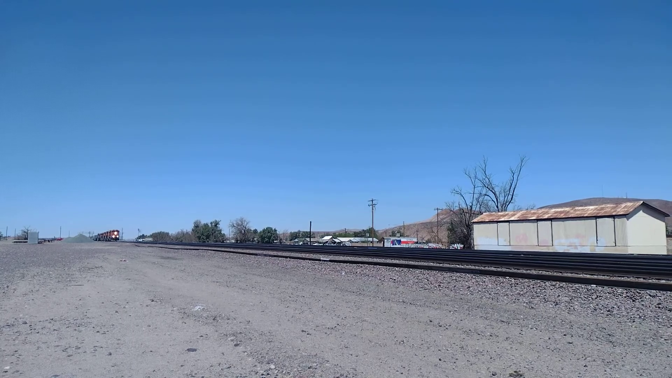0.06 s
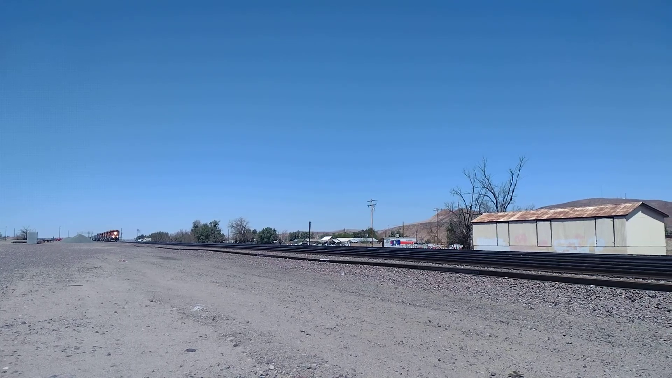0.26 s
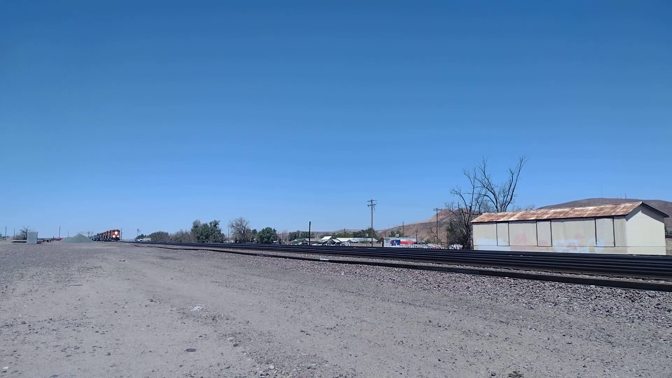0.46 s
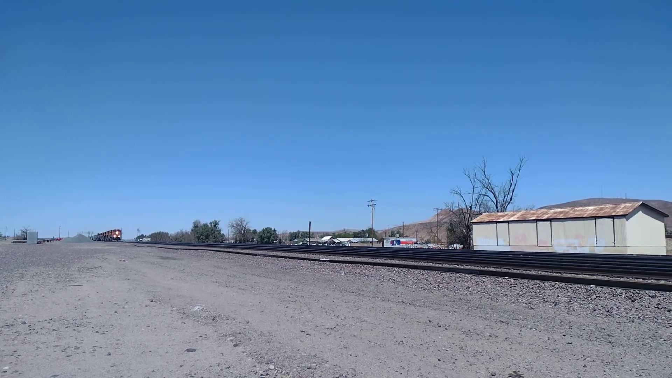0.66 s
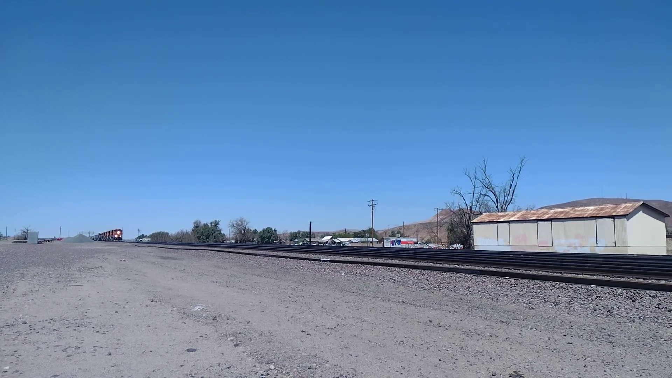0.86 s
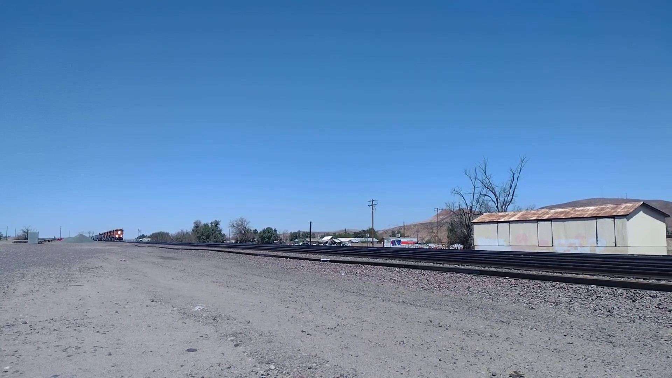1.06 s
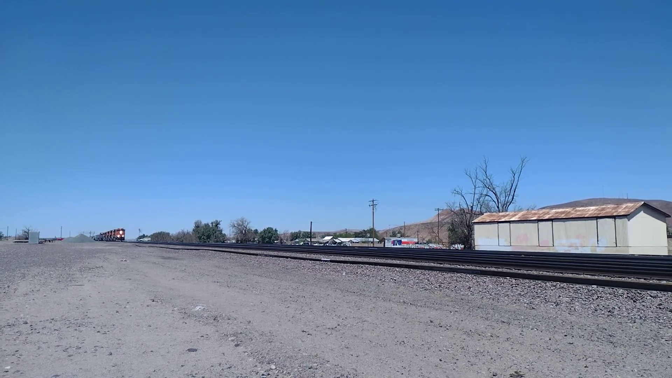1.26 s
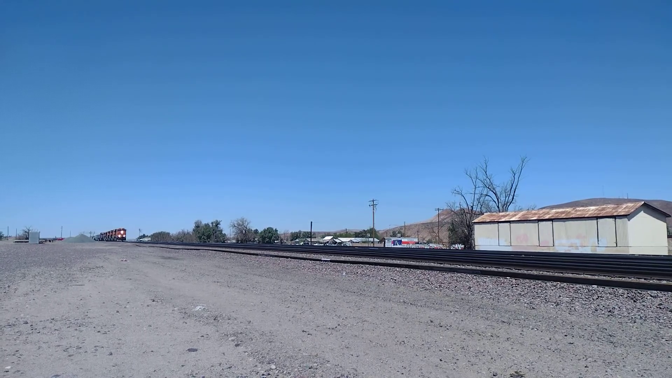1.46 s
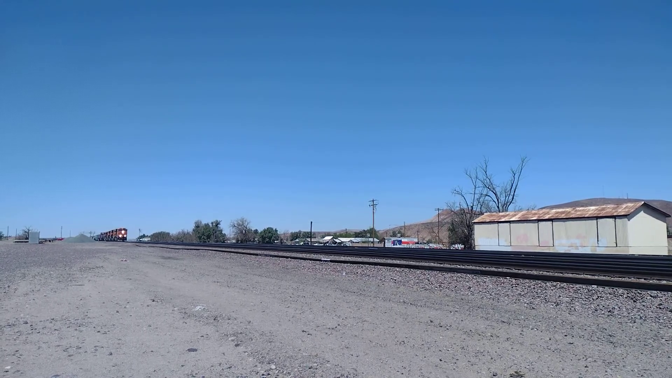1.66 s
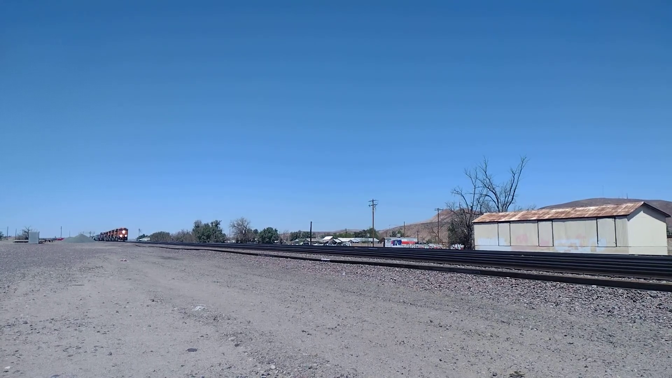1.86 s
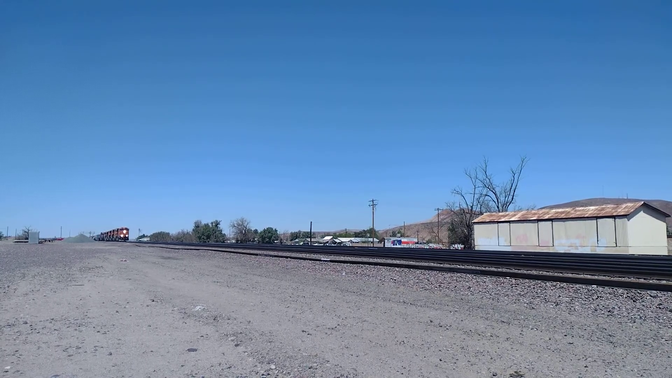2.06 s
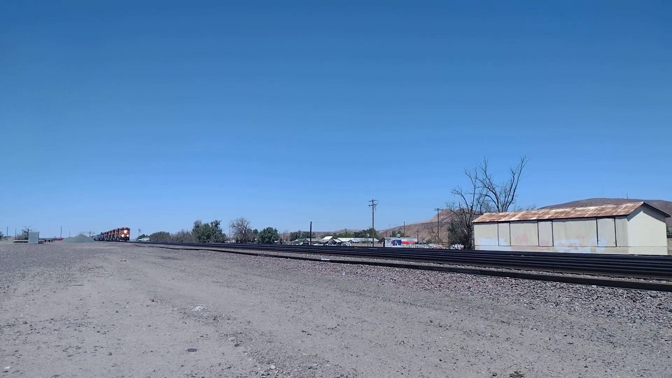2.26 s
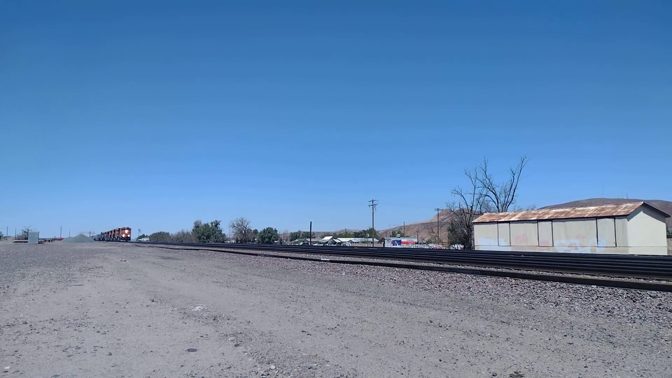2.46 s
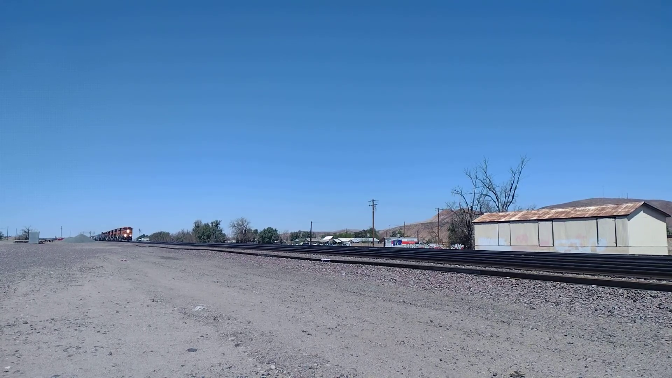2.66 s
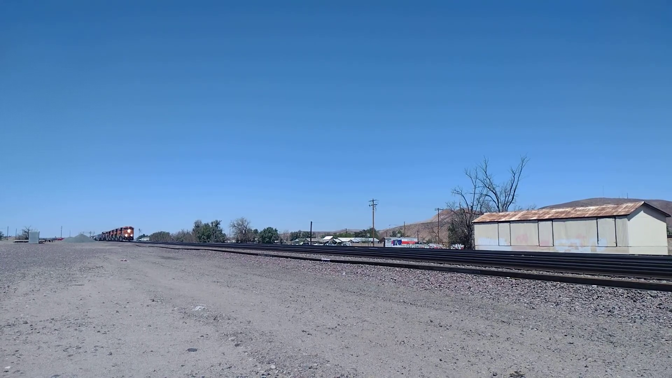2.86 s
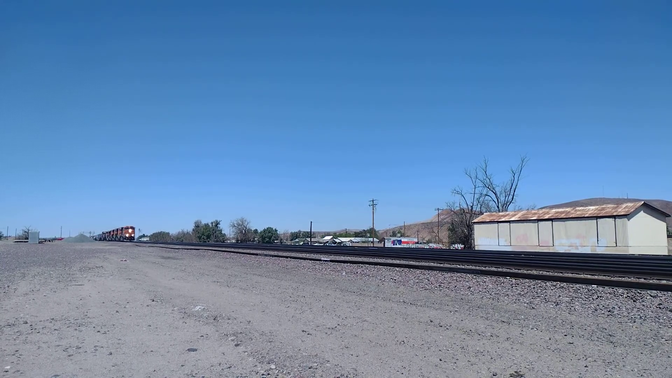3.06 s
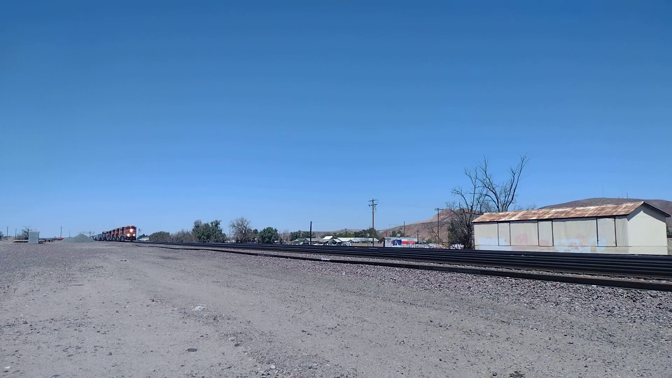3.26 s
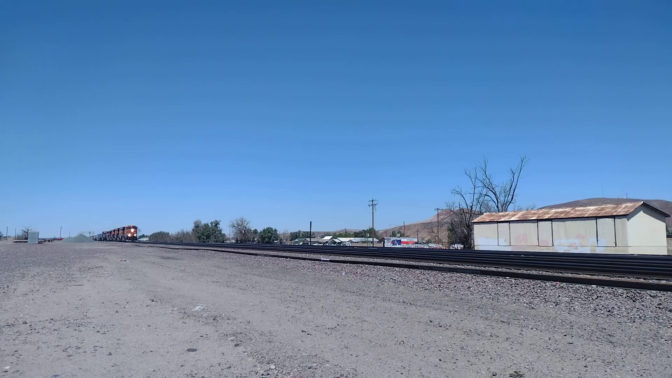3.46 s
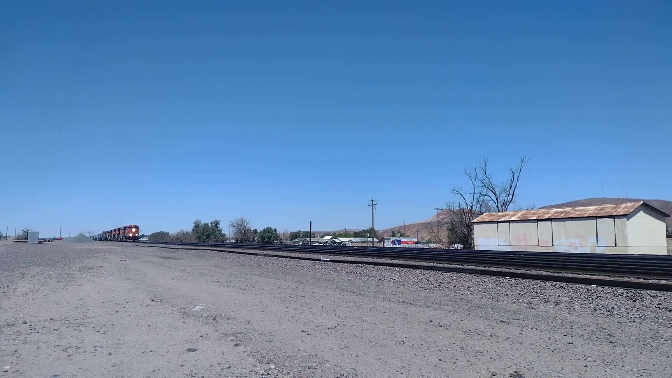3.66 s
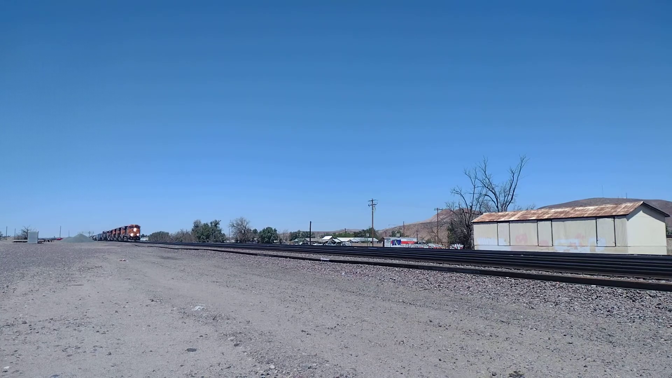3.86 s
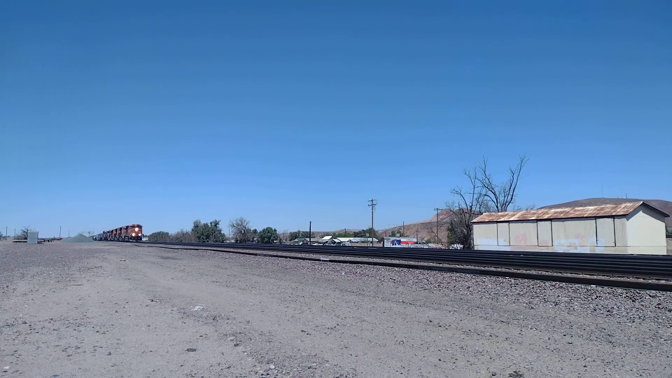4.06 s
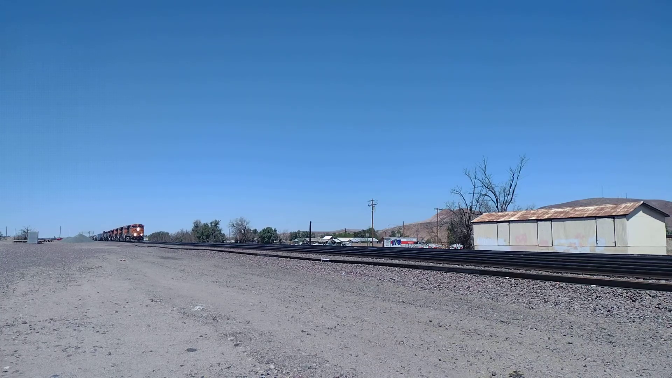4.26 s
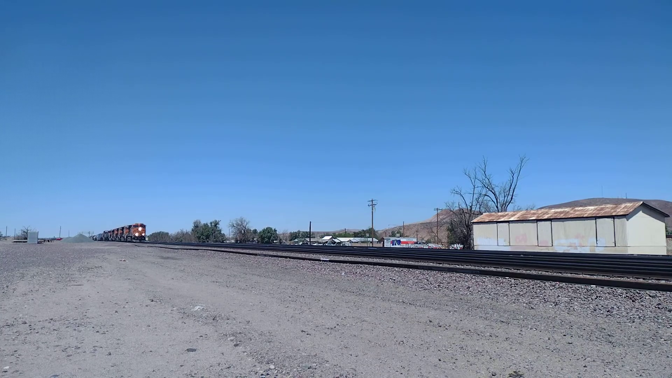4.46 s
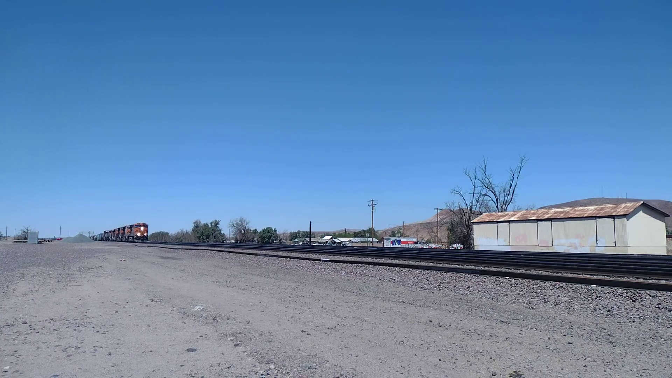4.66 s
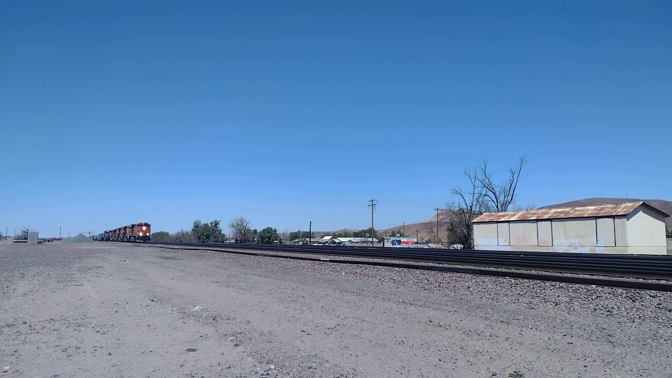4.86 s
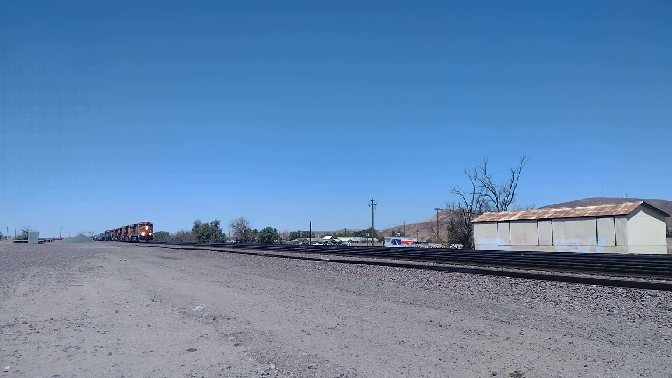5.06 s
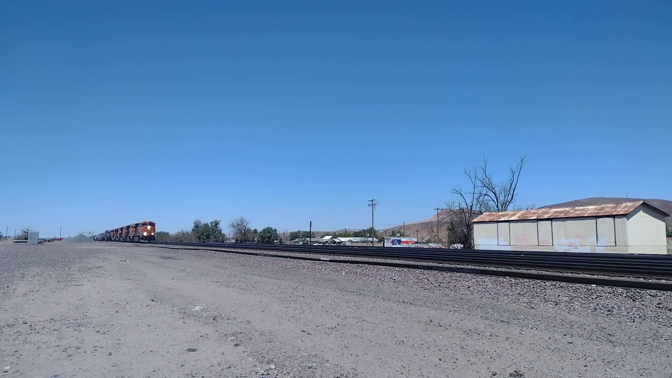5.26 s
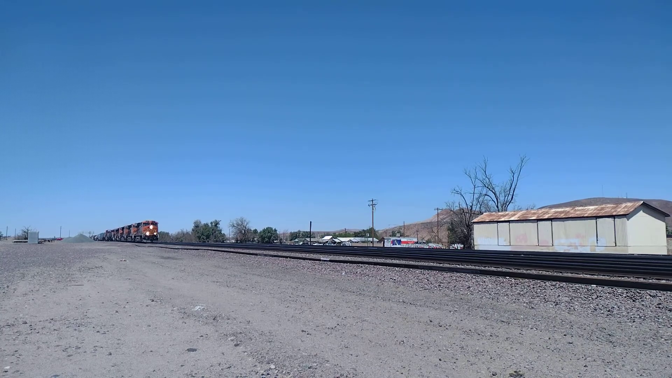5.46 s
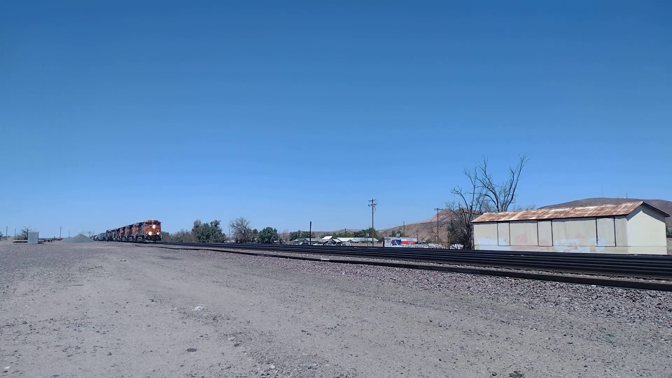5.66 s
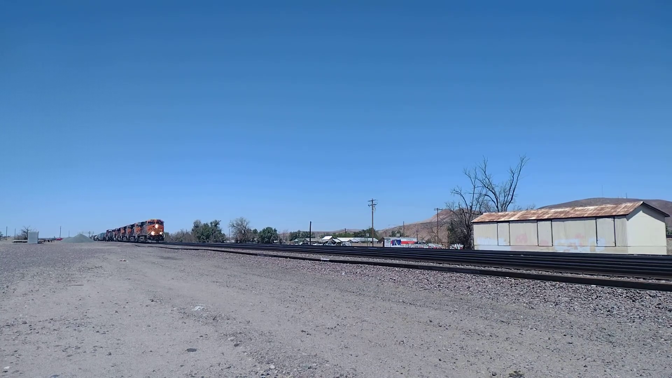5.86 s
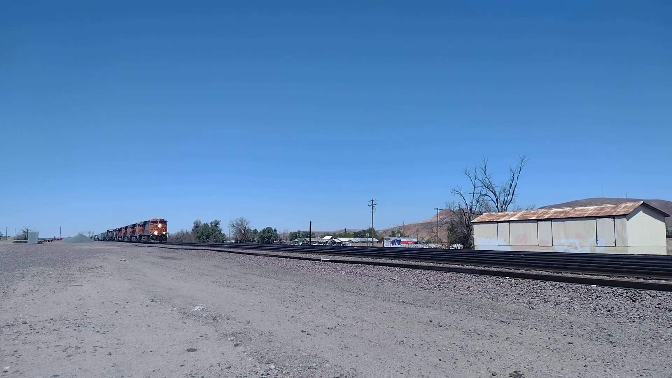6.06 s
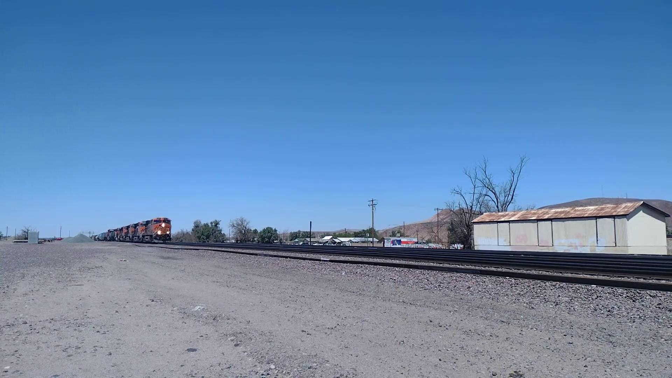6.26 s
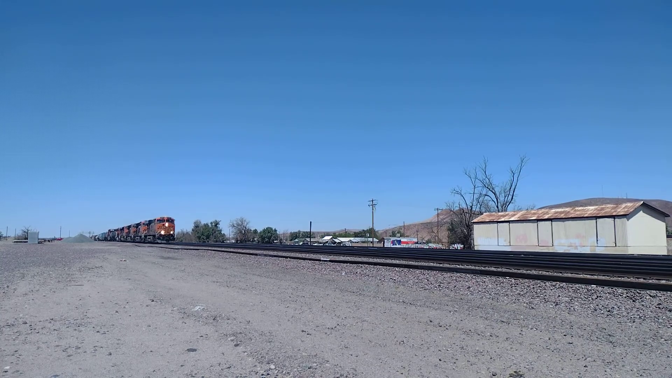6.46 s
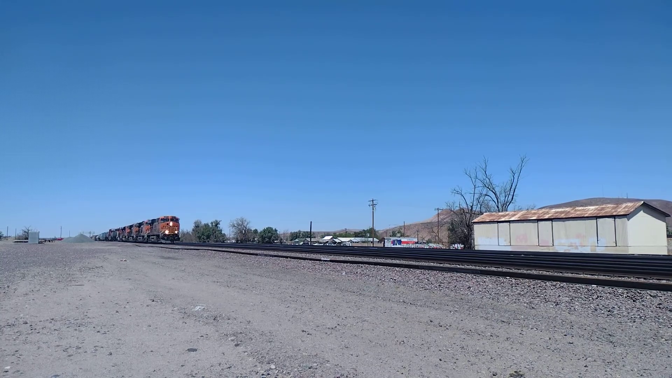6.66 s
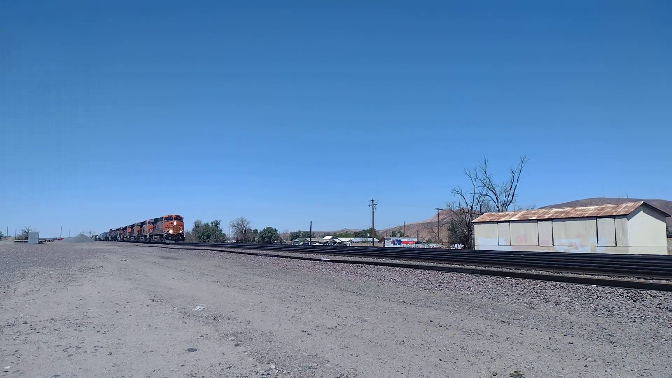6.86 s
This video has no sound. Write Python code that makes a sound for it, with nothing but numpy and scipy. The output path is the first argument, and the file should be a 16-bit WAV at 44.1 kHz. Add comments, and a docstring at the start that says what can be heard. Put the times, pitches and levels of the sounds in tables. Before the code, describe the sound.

A distant diesel freight train throbs steadily louder across an open gravel yard, with chirping birds, faint rail sizzle and three dull knocks.

```python
"""Beside the track in an open rail yard, a freight train approaches from the left for about seven seconds.
First come the yard's air, ticks and scuffs on gravel (noise) and a near bird's whistle (a gliding sine).
Harsh bird notes (noise bursts) and a farther bird's thin slurs (sines) join in; calls go on to the end.
All the while two diesels throb (sine lines, cylinder puffs), and wheels roar and rails sizzle (noise).
From 4.4 s three dull knocks come from the train, and near the end the rails give one faint squeak."""
import sys
import numpy as np
from scipy import signal
from scipy.fft import rfft, irfft, next_fast_len
from scipy.io import wavfile
from scipy.ndimage import uniform_filter1d, map_coordinates

SR = 44100
rng = np.random.default_rng(int(sys.argv[2]) if len(sys.argv) > 2 else 0)


def file_out(sig):
    """Save sig as 16-bit WAV at sys.argv[1]."""
    # one column per channel
    cols = np.atleast_2d(sig).T
    # limit, then scale
    lim = np.clip(cols, -1, 1)
    pcm = np.round(lim * 32767).astype(np.int16)
    wavfile.write(sys.argv[1], SR, pcm)


N = 304731
TIME = np.arange(N) / SR


def amp(db):
    """Decibels as an amplitude factor."""
    return 10 ** (np.asarray(db) / 20)


def unit(x):
    """x at rms 1."""
    return x / np.sqrt(np.mean(x ** 2) + 1e-20)


def along(points, hz):
    """Value at hz from (Hz, value) points on a log frequency axis."""
    point_hz, value = np.transpose(points)
    return np.interp(np.log(hz + 1), np.log(point_hz + 1), value)


def curves(rows):
    """One value per sample for each column after the time."""
    s, *columns = np.transpose(rows)
    return [np.interp(TIME, s, column) for column in columns]


def wobble(rate, size=N):
    """A smooth random curve of size samples, rate knots a second."""
    knots = rng.standard_normal(int(size * rate / SR) + 4)
    return map_coordinates(knots, [TIME[:size] * rate])


def filtered(x, response):
    """x times a response of frequency."""
    m = next_fast_len(N + 8192)
    gain = response(np.fft.rfftfreq(m, 1 / SR))
    return irfft(rfft(x, m) * gain, m)[..., :N]


def coloured(x, spectrum):
    """x shaped by a (Hz, dB) spectrum, at rms 1."""
    return unit(filtered(x, lambda hz: amp(along(spectrum, hz))))


def noise(spectrum, channels=2):
    """Unrelated noises of one colour, at rms 1."""
    return coloured(rng.standard_normal((channels, N)), spectrum)


def band(hz, width_hz):
    """A narrow band of noise on three paths, at rms 1."""
    response = lambda f: 1 / (1 + (2 * (f - hz) / width_hz) ** 4)
    return unit(filtered(rng.standard_normal((3, N)), response))


def swell(s, db, half_s):
    """A bell-shaped envelope."""
    return amp(db) * np.exp(-.5 * ((TIME - s) / half_s) ** 2)


def glide(hz):
    """A sine that follows a pitch curve."""
    return np.sin(2 * np.pi * np.cumsum(hz) / SR)


def patchy(x, depth_db):
    """Moving air lets patches of the spectrum swell and fade."""
    z = signal.stft(x, nperseg=1024)[2]
    field = rng.standard_normal(z.shape[1:])
    field = uniform_filter1d(field, 6, 0)  # smooth across frequency
    field = uniform_filter1d(field, 20, 1)  # smooth along time
    z = z * amp(depth_db * unit(field))
    return unit(signal.istft(z, nperseg=1024)[1][:, :N])


# bands that the ground reflection cancels for a while, or reinforces where the depth is negative:
# deepest_s [s], pitch_hz then [Hz], depth_db [dB], half_s, half length [s]
GROUND_DIPS = [(1.6, 300, 4.5, .6), (2, 720, 8.5, 1.5), (1.5, 1190, 6, 0.59), (1.35, 1570, -5.5, .45),
               (3.75, 1500, 9, 0.65), (3.7, 1130, -4, .6), (6.5, 860, 6, 1)]


def over_ground(x, patchy_db):
    """The ground reflection cancels or reinforces bands that slide down, through moving, patchy air."""
    slide_per_s, width_hz = .1, 81  # the slide is a share of the pitch
    hz, t, z = signal.stft(patchy(x, patchy_db), SR, nperseg=1024)
    for s, centre_hz, depth_db, half_s in GROUND_DIPS:
        offset = (hz[:, None] - centre_hz * np.exp(-slide_per_s * (t - s))) / width_hz
        nearness = np.exp(-.5 * (offset ** 2 + ((t - s) / half_s) ** 2))
        z = z * amp(-depth_db * nearness)
    return unit(signal.istft(z, SR, nperseg=1024)[1][:, :N])


# how much of the train's sound arrives straight: pitch_hz [Hz], share of power [0 to 1]
STRAIGHT_SHARE = [(60, .85), (150, 0.86), (400, 0.67), (1000, .68), (1500, 0.51), (2000, 0.24),
                  (3000, 0.16), (6000, 0.04)]


def from_track(paths):
    """Path 0 comes straight and reaches the left side first; paths 1 and 2 are scattered by the yard."""
    lead_ms, lead_ms_per_s = 0.2, 0.048  # the left side's lead at the start, and its growth
    share = lambda hz: np.clip(along(STRAIGHT_SHARE, hz), 0, 1)
    straight = filtered(paths[0], lambda hz: np.sqrt(share(hz)))
    lag = (lead_ms + lead_ms_per_s * TIME) * SR / 1000  # in samples
    left, right = [map_coordinates(straight, [np.arange(N) + side * lag / 2], mode="nearest")
                   for side in (1, -1)]
    scattered = filtered(paths[1:], lambda hz: np.sqrt(1 - share(hz)))
    return np.array([left, right]) + scattered


# colour of the yard's air: pitch_hz [Hz], level_db [dB per Hz, relative]
AIR_COLOUR = [(100, 10), (700, 11.5), (1300, -1), (2500, 4), (3300, -7), (5000, -11.5), (8000, -15.5),
              (16000, -15.5)]


def yard_air():
    """The open yard's steady background, as coloured noise in two unrelated channels."""
    return amp(-67.5) * noise(AIR_COLOUR)


# a tick and soft scuffs on gravel: peak_s [s], level_db [dB], half_s, half length [s]
GRAVEL_SCUFFS = [(0.49, -61.5, 0.0015), (0.853, -72.5, .2), (0.95, -64, 0.022), (0.996, -71, 0.026),
                 (1.053, -68, 0.017)]


def scuffs():
    """Grains rubbing on each other, as brief swells of bright, gritty noise."""
    grit = noise([(800, -2.5), (2000, 4.0), (4200, -2.5), (6000, -11.5), (7500, -16.5),
                  (10500, -17.0), (15000, -28.0)])
    return sum(swell(*row) for row in GRAVEL_SCUFFS) * grit


# a tick on the gravel, then harsh bird notes: peak_s [s], level_db [dB], half_s, half length [s]
HARSH_NOTES = [(0.488, -60, 0.0012), (1.601, -61, .011), (2.066, -69.5, 0.011), (3.04, -57.5, 0.017),
               (6.276, -61, 0.0058)]


def harsh_notes():
    """A sharp tick and short, rough notes: a band of noise pulsed 160 times a second."""
    harsh = noise([(1200, -36.5), (2100, -1.0), (2550, 8.5), (3000, -4.5), (3800, -12.5),
                   (5000, -23.0), (7000, -23), (11000, -48)])
    harsh = unit(harsh * (1 + 0.5 * np.sin(2 * np.pi * 160 * TIME)))
    return sum(swell(*row) for row in HARSH_NOTES) * harsh


# the farther bird's phrases: start_s [s], pitch factor, first note's and second note's level_db [dB]
FAR_PHRASES = [(2.137, 0.92, -82, -76.5), (3.828, 1.02, -76, -72.5), (4.883, 1, -75.5, -74),
               (5.335, 1.27, -77.5, -80), (6.403, 0.96, -73, -87)]
# its two falling notes: start_s within the phrase [s], first_hz and last_hz before the pitch factor [Hz],
# length_s [s]
FAR_NOTES = [(0, 4610, 2950, .074), (0.1, 3510, 2920, 0.055)]


def far_bird():
    """Thin slurs in pairs: sines that fall in pitch, with an unsteady edge."""
    song, t = np.zeros(N + SR), np.arange(SR // 8) / SR
    for s, pitch, *note_dbs in FAR_PHRASES:
        for db, (delay, first_hz, last_hz, length_s) in zip(note_dbs, FAR_NOTES):
            part = np.clip(t / length_s, 0, 1)
            hz = pitch * (first_hz + (last_hz - first_hz) * part) + 90 * wobble(230, size=len(t))
            level = amp(db + 2.4 * wobble(100, size=len(t)))
            shape = level * np.sqrt(np.abs(np.sin(np.pi * part)))
            song[round((s + delay) * SR):][:len(t)] += shape * glide(hz)
    return song[:N]


# the near bird's calls: start_s [s], level_db, added to the whistle's [dB], pitch factor
NEAR_CALLS = [(0.635, -64, 0.94), (1.719, -59.5, 0.95), (2.495, -56.5, 0.99), (3.624, -58, 0.95),
              (6.651, -57.5, 0.95)]
# its whistle: time_s from its start [s], pitch_hz before the call's factor [Hz],
# level_db, relative to the call [dB]
NEAR_WHISTLE = [(0, 3705, -13), (.014, 4410, -3), (.018, 4110, -11), (.022, 4030, -2.5), (.04, 3700, -7),
                (.073, 2936, -14), (.11, 2650, -43)]


def near_bird():
    """One repeated whistle that rises clean and falls raspy, its rasp shaking both pitch and level."""
    song, t = np.zeros(N + SR), np.arange(SR // 8) / SR
    whistle_hz, whistle_db = [curve[:len(t)] for curve in curves(NEAR_WHISTLE)]
    for s, db, pitch in NEAR_CALLS:
        rasp_hz = rng.normal(230, 27) * (1 + .2 * wobble(90, size=len(t)))
        rasp = glide(rasp_hz) * np.clip(t / 0.02, 0, 1) ** 2  # full after 20 ms
        hz = pitch * whistle_hz + 150 * rasp + 55 * wobble(200, size=len(t))
        level = amp(db + whistle_db + 1.5 * wobble(86, size=len(t)))
        song[round(s * SR):][:len(t)] += level * (1 + 0.55 * rasp) * glide(hz)
    return song[:N]


def birds():
    """Whistle and slurs with a short scattered echo, a little stronger at the right, and harsh notes."""
    song = near_bird() + far_bird()
    t = np.arange(SR // 8) / SR
    scatter = rng.standard_normal((2, len(t))) * amp(-60 * t / 0.22)  # falls 60 dB per 0.22 s
    scatter = scatter / np.linalg.norm(scatter[0])
    echo = signal.fftconvolve(song[None], scatter, axes=1)[:, :N]
    return (song + amp(-4.5) * echo) * amp([[-1], [1]]) + harsh_notes()


# sizzle of the rails: time_s [s], level_db, before a common gain and the balance of the sides [dB]
SIZZLE_LEVEL = [(0.2, -89.5), (2.47, -90), (3.65, -83.5), (4.79, -81.5), (4.81, -76), (5.47, -80.5),
                (6.01, -74), (6.1, -82), (6.27, -70), (6.47, -77.5), (6.82, -76.5)]
# colour of the sizzle: pitch_hz [Hz], level_db [dB per Hz, relative]
SIZZLE_COLOUR = [(6000, -32.5), (9500, -21), (10800, -11.5), (11700, -17), (12700, -3.5), (14500, 0),
                 (15700, 1.5), (17000, -23.5)]


def rail_sizzle():
    """The steel carries a flickering high hiss ahead of the train, stronger at the right."""
    level_db = curves(SIZZLE_LEVEL)[0] + 3.5 + 1.4 * wobble(18)
    sizzle = amp(level_db) * patchy(noise(SIZZLE_COLOUR), depth_db=1.1)
    return sizzle * amp([[-2], [1.6]])


# singing bands of the rails: pitch_hz [Hz], width_hz [Hz], level_db [dB, relative]
SINGING_BANDS = [(1577, 180, -0.5), (1854, 160, -1.5), (2500, 350, -12)]


def rail_song():
    """The steel rings in a few bands that swell with the train, and gives one thin, faint squeak."""
    song = sum(amp(db) * band(hz, width_hz) for hz, width_hz, db in SINGING_BANDS)
    song = amp(nearing(mean_db=-65, growth=0.98)) * over_ground(song, patchy_db=1.5)
    squeak = swell(6.69, db=-77, half_s=.03) * band(8150, width_hz=240)
    return from_track(song + squeak)


# dull knocks from the train: peak_s [s], level_db [dB], half_s, half length [s]
TRAIN_KNOCKS = [(4.43, -36.5, 0.013), (4.797, -26, 0.0069), (5.17, -35, 0.02)]


def knocks():
    """Dull blows from the train: brief swells of low noise, the same at both sides."""
    thud = noise([(100, -25.0), (220, 1.0), (330, 2), (420, -8.5), (520, -2.5), (700, -24.5),
                  (1500, -48.5), (4000, -89)], channels=1)
    return sum(swell(*row) for row in TRAIN_KNOCKS) * thud


# colour of the wheels' roar: pitch_hz [Hz], level_db [dB per Hz, relative]
WHEEL_COLOUR = [(400, -24), (750, -1), (1100, 5.5), (1400, -0.5), (1600, -2.5), (1900, -5), (2200, -10),
                (2700, -17), (3200, -24.5), (4200, -33.5), (6000, -39), (11000, -43.5), (16000, -63.5)]


def wheel_roar(wheel_db):
    """Steel rolling on steel: a broad, slightly unsteady roar from the cars behind."""
    level_db = wheel_db + 2.5 + 0.47 * wobble(6)
    return amp(level_db) * over_ground(noise(WHEEL_COLOUR, channels=3), patchy_db=0.3)


# colour of the fans' rush: pitch_hz [Hz], level_db [dB per Hz, relative]
FAN_COLOUR = [(120, -22.5), (250, -1.5), (330, -2), (450, -7), (600, -3.5), (750, -8.5), (1000, -14.5),
              (1600, -42), (3000, -76.5)]


def fan_rush():
    """Air rushing through the diesels' fans, as noise that swells with the whole train."""
    level_db = nearing(mean_db=-46.5, growth=1.25) + 0.14 * wobble(15)
    return amp(level_db) * over_ground(noise(FAN_COLOUR, channels=3), patchy_db=1.0)


# colour of the low rumble: pitch_hz [Hz], level_db [dB per Hz, relative]
RUMBLE_COLOUR = [(15, -12.5), (32, -16.5), (45, -15.5), (58, -3.5), (80, -1), (110, 2.5), (150, -7.5),
                 (250, -31), (900, -110)]


def rumble(drone_db):
    """Low noise that follows the exhaust drone, 9 dB below it."""
    return amp(drone_db - 9) * noise(RUMBLE_COLOUR, channels=3)


# colour of the exhaust bark: pitch_hz [Hz], level_db [dB per Hz, relative]
BARK_COLOUR = [(30, -39), (60, -8), (100, 0.5), (135, 1.5), (175, -2), (220, -2), (270, -11.5),
               (340, -16.5), (500, -27.5), (800, -56.5), (2000, -110)]


def bark(cycle_hz, uneven_db, fresh, cylinders=12):
    """Each cylinder fires its own turbulent puff; the pattern repeats every cycle, partly renewed."""
    cycle = cycle_hz * TIME + 0.0012 * wobble(2.8)
    firing = cycle * cylinders
    strength = amp(uneven_db * rng.standard_normal(cylinders))
    strength = strength[np.floor(firing).astype(int) % cylinders]
    pattern = rng.standard_normal((3, 8192))  # one cycle's turbulence on three paths
    place = (cycle % 1 * pattern.shape[1]).astype(int) % pattern.shape[1]
    turbulence = pattern[:, place] + fresh * rng.standard_normal((3, N))
    puffs = strength * np.exp(-1.2 * (firing % 1)) * turbulence
    return coloured(puffs, BARK_COLOUR)


def exhaust_bark(front_hz, rear_hz, bark_db):
    """The puffs of both diesels, heard over the ground."""
    puffs = bark(front_hz, uneven_db=3.0, fresh=0.74)
    puffs = puffs + amp(-3.0) * bark(rear_hz, uneven_db=0.0, fresh=.9)
    return amp(bark_db + 1.1) * over_ground(puffs, patchy_db=.5)


def drone(cycle_hz, orders, fade_db):
    """One diesel's low lines at multiples of its cycle rate; they beat together and waver on the way."""
    turn = 2 * np.pi * cycle_hz * TIME
    total = np.zeros(N)
    for order, db in orders:
        level = amp(db + fade_db * wobble(1.5))
        phase = rng.uniform(0, 2 * np.pi) + 0.22 * wobble(2.4)
        total += level * np.sin(order * turn + phase)
    return total


# strongest exhaust lines of each diesel: multiple of its four-stroke cycle rate, level_db [dB, relative]
FRONT_LINES = [(12, -9.5), (15, -0.5), (16, -10.5), (17, -11.5), (18, -13.5), (19, -17), (23, -16.5),
               (26, -16.5), (30, -23), (34, -22), (43, -21.5)]
REAR_LINES = [(10, -22), (14, -8.5), (16, -10.5), (20, -13.5), (21, -17.5)]


def exhaust_drone(front_hz, rear_hz, drone_db):
    """Both diesels' lines throb together; echoes from the sheds reach the two sides out of step."""
    lines = drone(front_hz, FRONT_LINES, fade_db=-1.0) + drone(rear_hz, REAR_LINES, fade_db=3.0)
    echoes = drone(front_hz, FRONT_LINES, fade_db=5.5)
    echoes = unit(echoes + amp(4.0) * drone(rear_hz, REAR_LINES, fade_db=4.0))
    return amp(drone_db) * (unit(lines) + amp(-14.5) * np.array([echoes, -echoes]))


# the approach: time_s [s], then level_db of the exhaust drone, of the exhaust bark and of the wheels
# [dB, bark and wheels before their own gains]
APPROACH = [(0.15, -33, -42.5, -69.5), (0.75, -30.5, -40, -69), (1.15, -31.5, -38.5, -68.5),
            (1.45, -30.5, -32.5, -66.5), (2.2, -26.5, -32.5, -64), (3.1, -23.6, -31.5, -58.5),
            (3.5, -24.5, -30, -55.5), (4.15, -23, -28.5, -55), (4.8, -23, -28.6, -54.5),
            (5.35, -20.1, -27.5, -51), (5.85, -21.1, -26.5, -52.5), (6.65, -19, -24.8, -50.5)]


def nearing(mean_db, growth):
    """Level in dB of a layer that swells as the train draws near, growth dB for each dB of the train."""
    train_db = np.mean(curves(APPROACH), axis=0)
    return mean_db + growth * (train_db - train_db.mean())


def train():
    """Two diesels at slightly different speeds, their fans, and the wheels of the cars behind."""
    front_hz, rear_hz = 5.156, 5.338  # four-stroke cycles a second
    drone_db, bark_db, wheel_db = curves(APPROACH)
    lines = exhaust_drone(front_hz, rear_hz, drone_db)
    exhaust = rumble(drone_db) + exhaust_bark(front_hz, rear_hz, bark_db)
    return lines + from_track(exhaust + fan_rush() + wheel_roar(wheel_db))


def scene():
    """Everything heard from beside the track, from the yard's air to the train."""
    background = yard_air() + scuffs() + birds()
    return background + rail_sizzle() + rail_song() + knocks() + train()


def record(dry):
    """The microphone's channel keeps nothing from its band limit of 15750 Hz upward."""
    return filtered(dry, lambda hz: hz < 15750)


dry = scene()
out = record(dry)
file_out(out)
```